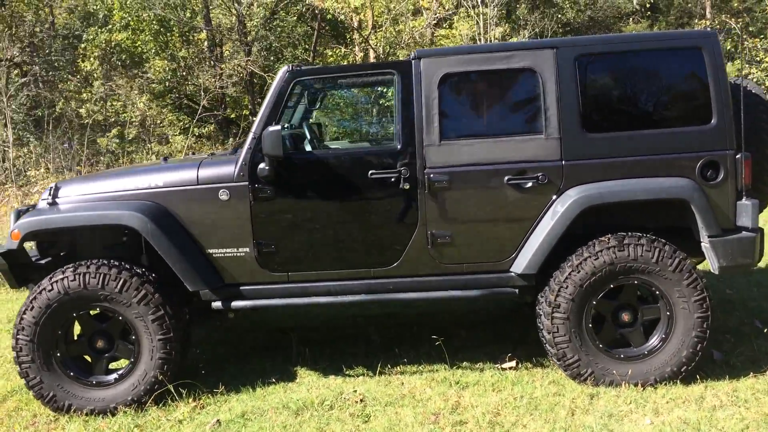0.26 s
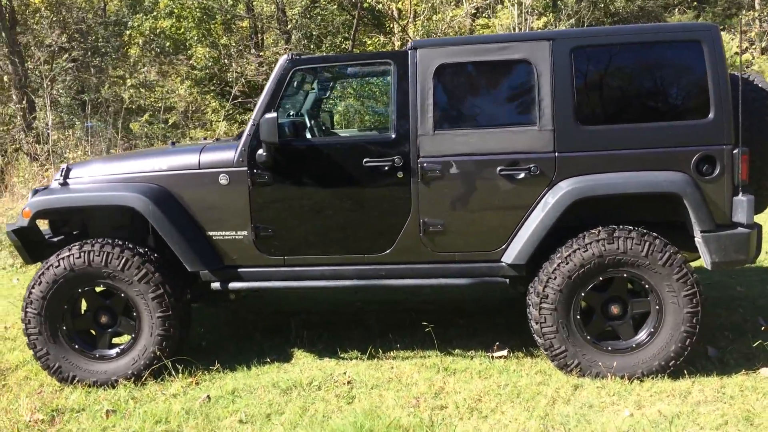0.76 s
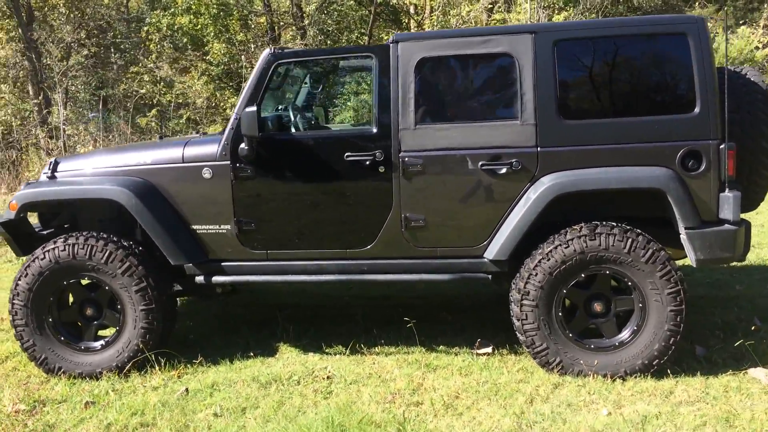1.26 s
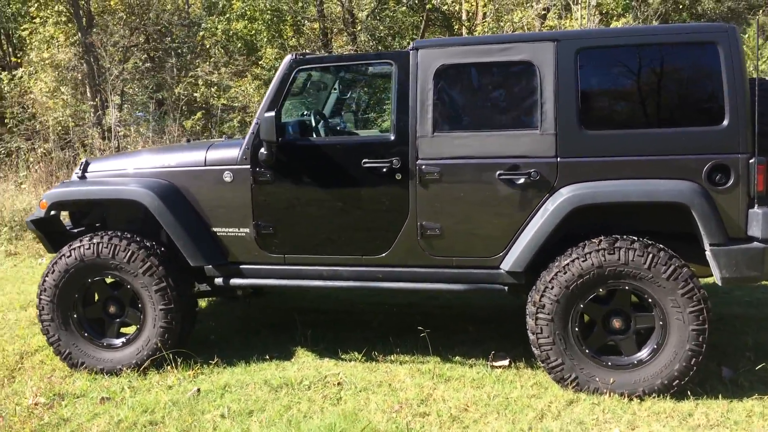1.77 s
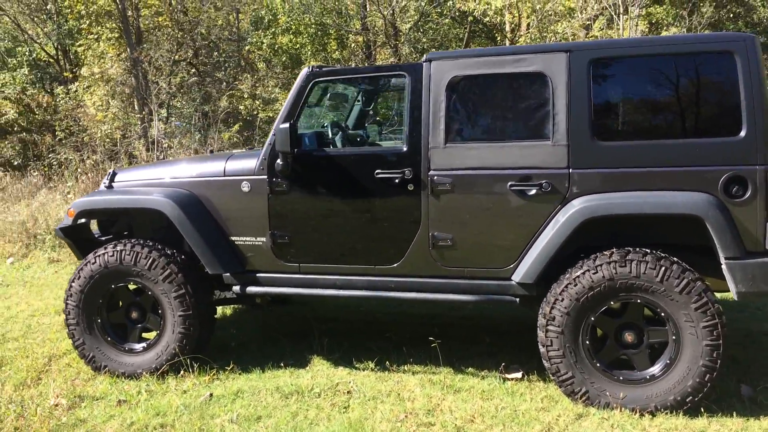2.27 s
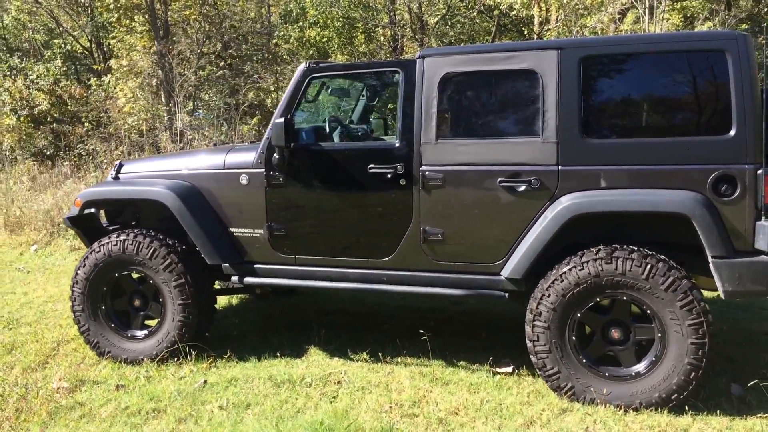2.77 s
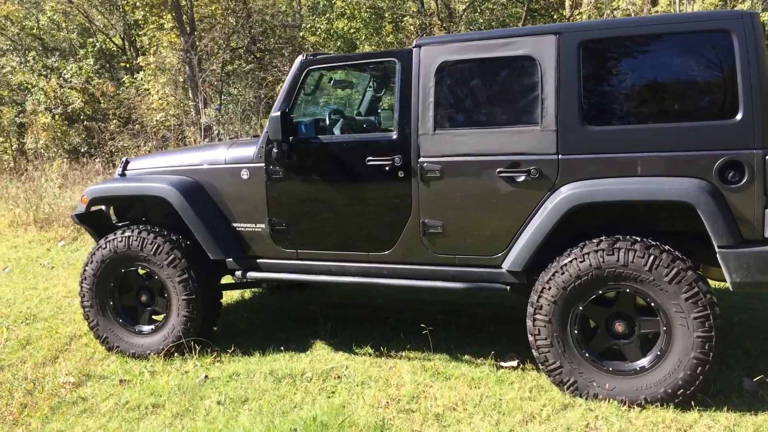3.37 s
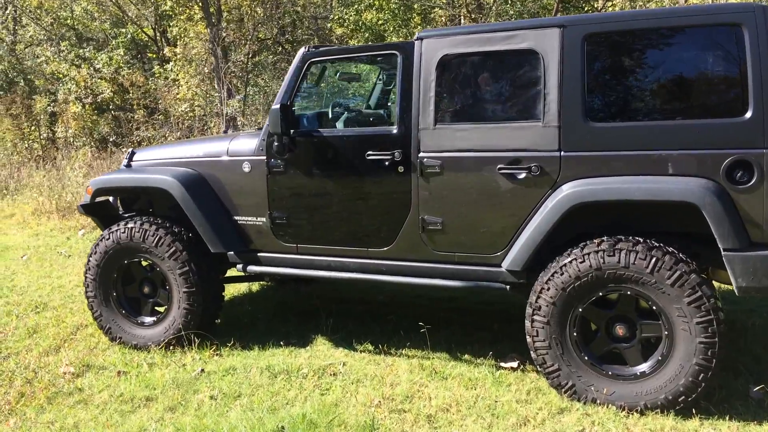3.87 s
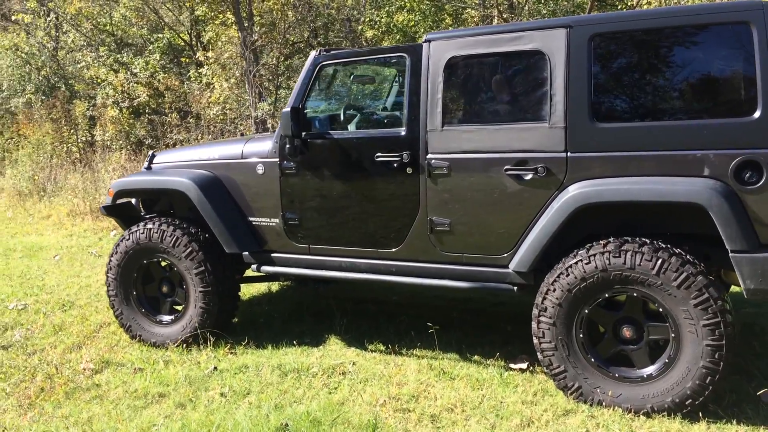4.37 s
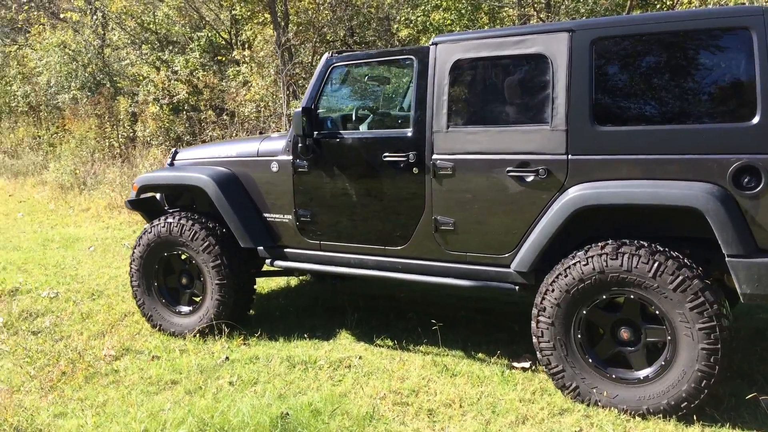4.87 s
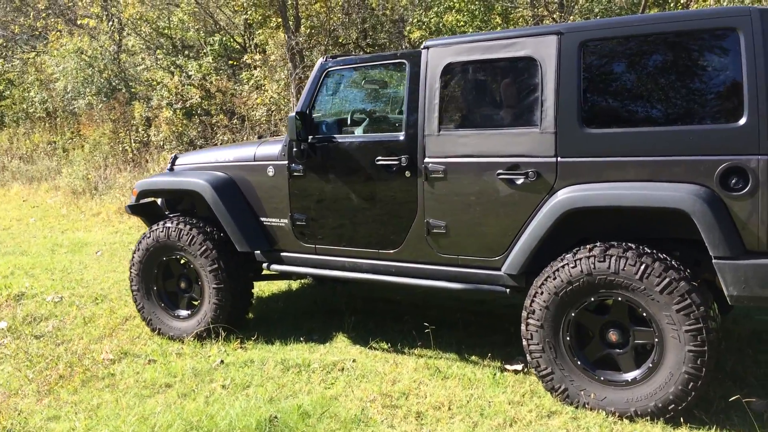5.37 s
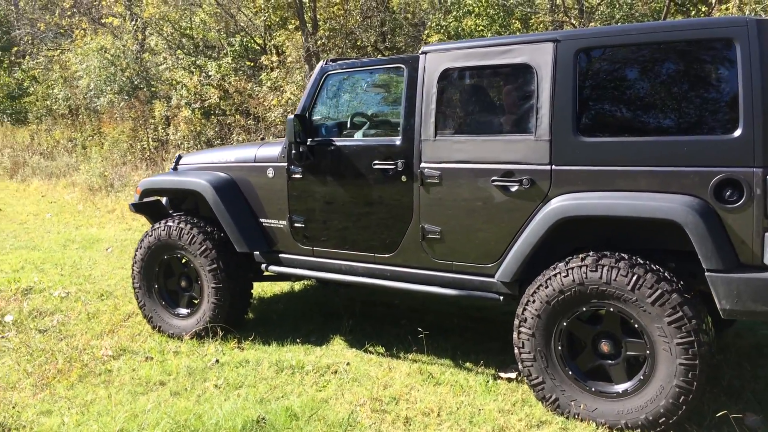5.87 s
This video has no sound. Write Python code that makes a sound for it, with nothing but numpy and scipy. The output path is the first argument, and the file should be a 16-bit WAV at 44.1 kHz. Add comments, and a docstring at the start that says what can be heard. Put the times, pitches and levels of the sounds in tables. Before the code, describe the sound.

Slow walking on a lawn, heard as soft bassy bumps through a handheld phone, over shrill insect shimmer, with a late burst of handling knocks.

```python
"""A lawn at the edge of a wood, where someone walks slowly holding a phone. Steps arrive as dull thuds
(bell-shaped pushes), grass swishes and shoes scuff it (filtered clicks). Near the end fingers knock
(damped modes) and rub (dense clicks) on the case. A katydid buzzes in short falling chirps over an
insect chorus of band noise, crickets trill faintly as pulsing tones and a wavering sine hums far away."""
import sys
import numpy as np
from scipy import signal
from scipy.fft import rfft, irfft, next_fast_len
from scipy.io import wavfile
from scipy.ndimage import uniform_filter1d

SR = 44100
rng = np.random.default_rng(int(sys.argv[2]) if len(sys.argv) > 2 else 0)


def dump_mix(stems):
    """Bounce the given channels to the path in sys.argv[1] as a 16-bit WAV at rate SR."""
    frames = np.atleast_2d(stems).T  # one column per channel
    limited = np.clip(frames, -1, 1)  # hard clip at full scale
    pcm = np.round(limited * 32767).astype(np.int16)
    wavfile.write(sys.argv[1], SR, pcm)


N = 269165
T = np.arange(N) / SR

# case slips in the grip: time_s, level_db
SLIP_EVENTS = [(.249, -50.5), (1.703, -39), (2.240, -44), (2.650, -45), (2.692, -46.5), (2.966, -48),
               (3.416, -45), (3.7238, -41.5), (4.204, -43), (4.696, -48), (4.7373, -30), (4.772, -38.5),
               (4.799, -37.5), (4.8238, -37.5), (4.8753, -35.5), (4.9002, -40), (4.9205, -41),
               (4.9484, -37.5), (5.058, -47), (5.0631, -42), (5.0773, -32), (5.1035, -43), (5.1163, -40.5),
               (5.1662, -38)]
# finger strikes the case and slides on: time_s, level_db, pitch_hz, snap_db (against the knock), slide_db
TAP_EVENTS = [(5.2362, -23, 706, 4, -52.5), (5.3066, -31, 980, 10.5, -38)]
# low rumble spectrum: freq_hz, relative_db
RUMBLE_SPECTRUM = [(20, -41), (35, -7.5), (55, 6.5), (80, 6), (130, 1.5), (200, -4), (280, -21),
                   (450, -49.5)]


def undb(db):
    """Decibels to gain."""
    return 10 ** (np.asarray(db) / 20)


def unit(x):
    """Scale to an rms of 1."""
    return x / np.sqrt(np.mean(x ** 2))


def curve(rows):
    """Join (time_s, value) rows by straight lines."""
    return np.interp(T, *np.transpose(rows))


def colour(x, points):
    """Causal minimum-phase filter through (freq_hz, db) points, via the folded cepstrum."""
    hz, db = np.transpose(points)
    size = next_fast_len(2 * N, real=True)
    size += size % 2
    f = np.maximum(np.fft.rfftfreq(size, 1 / SR), 1)
    gain = undb(np.interp(np.log(f), np.log(hz), db))
    cepstrum = irfft(np.log(gain))
    cepstrum[1:size // 2] *= 2
    cepstrum[size // 2 + 1:] = 0
    response = np.exp(rfft(cepstrum))
    return irfft(rfft(x, size) * response)[:N]


def resonate_twice(x, hz, width_hz):
    """Two equal resonances in series; width_hz is that of each."""
    b, a = signal.iirpeak(hz, hz / width_hz, fs=SR)
    return signal.lfilter(b, a, signal.lfilter(b, a, x))


def noise():
    """White noise."""
    return rng.standard_normal(N)


def walk(rate_hz):
    """Smoothed random steps, rms 1."""
    k = int(SR / rate_hz)
    steps = np.repeat(rng.standard_normal(N // k + 1), k)
    return unit(uniform_filter1d(steps, k)[:N])


def grains(rate_hz, spread_db):
    """Dense random clicks of uneven size."""
    hits = rng.random(N) < rate_hz / SR
    boost_db = spread_db * np.minimum(rng.exponential(size=N), 4)
    return hits * noise() * undb(boost_db)


def swell(peak_s, rise_s, fall_s):
    """Envelope of one stroke: Gaussian rise, near-exponential fall."""
    d = T - peak_s
    return np.exp(-np.where(d < 0, (d / rise_s) ** 2, np.abs(d / fall_s) ** 0.94))


def add(out, s, x):
    """Mix x into out from time s."""
    i = max(int(s * SR), 0)
    out[i:i + len(x)] += x[:max(N - i, 0)]


def push_acceleration(u):
    """Second derivative of a bell-shaped push; u is squared scaled time."""
    return (2 * u - 1) * np.exp(-u)


def thuds(low_cut_hz=38, heel_sharpness=5.1, shake_db=-15):
    """Each jolt is a bell-shaped push; the microphone feels its acceleration and loses the deepest part."""
    # steps and jolts through the arm: time_s, level_db, pitch_hz
    steps = [(0.2933, -19, 97), (.986, -36.5, 105), (1.331, -29, 108), (1.7156, -23.5, 121),
             (2.2476, -33.5, 121), (2.658, -33.5, 108), (2.971, -33.5, 147), (3.062, -16, 140),
             (3.52, -35, 148), (3.737, -19.5, 125), (4.284, -19.5, 125), (4.6339, -24.5, 122),
             (4.6991, -29.5, 227), (4.743, -27, 101), (4.7642, -22.5, 111), (4.7836, -30, 148),
             (4.805, -30, 109), (5.1768, -29.5, 110), (5.2362, -25.5, 114), (5.31, -12, 184),
             (5.6075, -25.5, 154)]
    # heel share climbs from soft to hard steps
    heel_soft, heel_hard, heel_from_db, heel_range_db = 0.064, .21, -22.5, 0.2
    out, half_s = np.zeros(N), .03
    t = np.arange(-half_s, half_s, 1 / SR)
    for s, db, hz in [*steps, *jolts()]:
        u = (np.pi * hz * t) ** 2
        hardness = 1 / (1 + np.exp((heel_from_db - db) / heel_range_db))
        heel_share = heel_soft + (heel_hard - heel_soft) * hardness
        sole = (1 - heel_share) * push_acceleration(u)
        heel = heel_share * push_acceleration(heel_sharpness * u)  # shorter, harder push
        add(out, s - half_s, undb(db) * (sole + heel))
    # the hand shakes a little around every jolt
    shake = uniform_filter1d(uniform_filter1d(np.abs(out), size=SR // 25), size=SR // 40)
    out = out + undb(shake_db) * shake * unit(colour(noise(), RUMBLE_SPECTRUM))
    return signal.sosfilt(signal.butter(2, low_cut_hz, "high", fs=SR, output="sos"), out)


def jolts(rate_hz=1.5, mean_db=-43, centre_hz=100, spread_db=8, slip_db=-3, slip_hz=160, slip_lag_s=0.0031):
    """Small pushes (time_s, level_db, pitch_hz): random hand jolts, and a nudge with every slip."""
    rows = []
    for when, size, pitch in rng.random((int(rate_hz * T[-1]), 3)):
        db = mean_db + spread_db * (2 * size - 1)
        rows.append((when * T[-1], db, centre_hz * 2 ** (pitch - .5)))
    for s, db in SLIP_EVENTS:
        rows.append((s + slip_lag_s, db + slip_db, slip_hz))
    return rows


def knocks(slip_contact_s=0.001, tap_contact_s=0.00041):
    """Slips of the grip ring the damped case softly; taps ring it hard and snap."""
    # case modes: pitch_ratio, relative_db, t60_s (divided by the damping)
    modes = [(0.998, -2.5, 0.014), (1.3, -7.5, 0.0042)]
    # snap spectrum: freq_hz, relative_db
    snap_spectrum = [(300, 5.5), (800, 1.5), (1200, 9), (1800, -3.5), (2600, 1.5), (3400, -8.5),
                     (4200, -18), (6000, -32), (8000, -40), (14000, -46)]
    start_hz, rise_hz_per_s = 667, 21  # slip pitch rises as the grip tightens
    pitch_scatter, slip_snap_db = 0.065, -17
    slip_damping = 1.27  # the case dies away faster under the skin
    out, t = np.zeros(N), T[:SR // 20]

    snap = colour(1. * (T == 0), snap_spectrum)[:len(t)]
    tail = 0.063 * noise()[:len(t)] * np.exp(-t / 0.0021)
    snap = np.convolve(snap, (t == 0) + tail)[:len(t)]
    snap = snap / np.abs(snap).max()

    hits = []
    for s, db in SLIP_EVENTS:
        hz = (start_hz + rise_hz_per_s * s) * (1 + pitch_scatter * rng.standard_normal())
        hits.append((s, db, hz, slip_snap_db, slip_contact_s, slip_damping))
    for s, db, hz, snap_db, _ in TAP_EVENTS:
        hits.append((s, db, hz, snap_db, tap_contact_s, 1))

    for s, db, hz, snap_db, contact_s, damping in hits:
        ring = np.zeros(len(t))
        for ratio, mode_db, t60_s in modes:
            decay = np.exp(-np.log(1000) * damping * t / t60_s)
            ring += undb(mode_db) * np.sin(2 * np.pi * hz * ratio * t) * decay
        ring *= 1 - np.exp(-t / contact_s)
        add(out, s, undb(db) * (ring / np.abs(ring).max() + undb(snap_db) * snap))
    return out


def scuffs_and_rubs(ring_db=-3, body_db=-1, ring_width_hz=600, rise_share=0.94):
    """Friction of shoes in grass, then of fingers on the case: dense clicks as body, resonance and rasp."""
    # shoe scuffs in the grass (first two rows), then finger slides on the case:
    # peak_s, length_s, level_db, resonance_hz, rasp_db
    friction_events = [(3.047, .018, -59.5, 1930, -5), (3.565, .014, -60, 2030, -3),
                       (4.79, .11, -56.5, 860, -15), (4.951, 0.024, -51.5, 625, 0.5),
                       (5.339, 0.029, -42.5, 1460, -25), (5.481, .016, -49, 830, -11.5),
                       (5.547, 0.037, -45, 940, -15), (5.597, .024, -40, 920, -11),
                       (5.714, .012, -54, 890, -12.5)]
    # spectra of body and rasp: freq_hz, relative_db
    body_spectrum = [(60, -17.5), (130, 7.5), (220, 13.5), (330, 4.5), (550, 0.5), (1000, -14.5),
                     (1700, -33), (2300, -46), (4500, -25.5), (9000, -67)]
    rasp_spectrum = [(1500, -13), (2100, -13), (2700, -5), (3000, -4), (3350, -11.5), (3650, -13),
                     (4300, -28), (6000, -27.5), (10000, -44)]
    # slide after each tap
    lag_s, rise_s, fall_s, slide_hz, slide_rasp_db = 0.0061, .0057, 0.046, 854, -16.5
    body = unit(colour(grains(6000, 5.2), body_spectrum))
    rasp = unit(colour(grains(8000, 0.89), rasp_spectrum))

    strokes = []
    for s, length_s, db, hz, rasp_db in friction_events:
        strokes.append((swell(s, rise_share * length_s, length_s), db, hz, rasp_db))
    for s, _, _, _, db in TAP_EVENTS:
        strokes.append((swell(s + lag_s, rise_s, fall_s), db, slide_hz, slide_rasp_db))

    out = np.zeros(N)
    for envelope, db, hz, rasp_db in strokes:
        ring = unit(resonate_twice(grains(6000, 2.7), hz, ring_width_hz))
        friction = undb(body_db) * body + undb(ring_db) * ring + undb(rasp_db) * rasp
        out += undb(db) * envelope * friction
    return out


def grass(rise_share=0.8):
    """Blades flick past the shoe: dense clicks, filtered and swelling in short swishes."""
    # shoe brushes: peak_s, length_s, level_db
    swishes = [(.3, 0.2, -68.5), (.79, 0.12, -67.5), (1.052, 0.069, -58.5), (1.205, 0.075, -56.5),
               (1.49, .045, -68.5), (1.665, 0.031, -62.5), (2.43, 0.075, -67.5)]
    # blade spectrum: freq_hz, relative_db
    blade_spectrum = [(1000, 2.5), (2000, -4), (3000, -12), (4000, -1.5), (5200, -8), (7600, 2.5),
                      (10000, -13.5), (15000, -27)]
    brushing = np.zeros(N)
    for s, length_s, db in swishes:
        brushing += undb(db) * swell(s, rise_share * length_s, length_s)
    return unit(colour(grains(3000, 2.6), blade_spectrum)) * brushing


def ticks(decay_s=0.00097):
    """Dry ticks of stalks and of a fingernail: tiny bursts of bright noise."""
    # ticks: time_s, level_db (before the filter)
    tick_events = [(0.1865, -37), (1.234, -37.5), (1.287, -42), (2.1355, -42), (5.235, -34.5)]
    # tick spectrum: freq_hz, gain_db
    tick_spectrum = [(600, -26), (2500, -13), (4300, -0.5), (7000, 3), (9000, -4), (12000, -26),
                     (15000, -32)]
    out, t = np.zeros(N), T[:SR // 100]
    for s, db in tick_events:
        tick = rng.standard_normal(len(t)) * np.exp(-t / decay_s)
        add(out, s, undb(db) * tick / np.abs(tick).max())
    return colour(out, tick_spectrum)


def katydid(stroke_hz=42.24, pitch_hz=7276, stroke_s=0.00151, glide_hz=220, rough=.35, echo_db=-7):
    """Every wing stroke is a short falling chirp; the leaves scatter it."""
    # stroke level before roughness and echo: time_s, level_db
    level_rows = [(0, -61.5), (1.4, -58.5), (1.9, -56.5), (3.5, -54.5), (5.3, -57), (6.1, -56.5)]
    out, t = np.zeros(N), T[:SR // 80]
    u = (t - t.mean()) / stroke_s
    draws = rng.standard_normal((int(T[-1] * stroke_hz), 3))
    for k, (late, size, pitch) in enumerate(draws):
        hz = pitch_hz * (1 + .007 * pitch) - glide_hz * u
        chirp = np.exp(-u ** 2 / 2) * np.sin(2 * np.pi * np.cumsum(hz) / SR)
        add(out, k / stroke_hz + .0017 * late, undb(1.1 * size) * chirp)
    out *= (1 + rough * walk(1200)) * undb(curve(level_rows))
    t_echo = T[:SR // 8]
    leaves = rng.standard_normal(len(t_echo)) * np.exp(-t_echo / 0.041)
    echo = signal.fftconvolve(out, leaves / np.linalg.norm(leaves))[:N]
    return out + undb(echo_db) * echo


def crickets(trill_hz=48, depth=0.34, flutter_db=2.0):
    """Far trills: nearly pure, pulsing tones with a wandering pitch and strength."""
    # trills: start_s, end_s, pitch_hz, level_db
    trills = [(-.1, .65, 3785, -80.5), (.72, 3.65, 3808, -80), (4.4, 5.75, 3810, -82.5),
              (5.83, 6.1, 3800, -80), (2.95, 3.2, 4570, -85), (5.0, 5.5, 4570, -82.5)]
    out, edge_s = np.zeros(N), .03
    for start, end, hz, db in trills:
        gate = np.clip(np.minimum(T - start, end - T) / edge_s, 0, 1)
        wandering_hz = hz * (1 + .004 * walk(4) + 0.0082 * walk(200))
        tone = np.sin(2 * np.pi * np.cumsum(wandering_hz) / SR)
        trill = unit(tone * (1 + depth * np.sin(2 * np.pi * trill_hz * T)))
        out += undb(db + flutter_db * walk(25)) * gate * trill
    return out


def drones():
    """Far machine whine, distant trills and air resonances as narrow noise bands that swell and fade."""
    # bands: freq_hz, width_hz (each of two resonances), level_db, flutter_db
    bands = [(676, 30, -76, 3), (1129, 26, -87, 3.5), (1415, 81, -78.5, 3), (2624, 330, -78, 2.5),
             (3160, 190, -87, 4)]
    out = np.zeros(N)
    for hz, width_hz, db, flutter_db in bands:
        out += unit(resonate_twice(noise(), hz, width_hz)) * undb(db + flutter_db * walk(11))
    return out


def chorus(level_db=-67.5):
    """Insect chorus: band noise with a quick slight flutter."""
    # chorus spectrum: freq_hz, relative_db
    chorus_spectrum = [(4500, -45), (6000, -12.5), (6600, -4), (7000, 0.5), (7300, 5.5), (7850, 5.5),
                       (8300, -10.5), (9500, -14.5), (11000, -19), (15000, -50)]
    return unit(colour(noise(), chorus_spectrum)) * undb(level_db + 0.77 * walk(80))


def hum(pitch_hz=102.6, level_db=-59.5, peak_s=1.7, swell_s=.6, swell_db=9.5):
    """Far hum: a sine of wavering pitch and level with one Gaussian swell."""
    db = level_db + swell_db * np.exp(-((T - peak_s) / swell_s) ** 2)
    tone = np.sin(2 * np.pi * np.cumsum(pitch_hz + 1.39 * walk(6)) / SR)
    return tone * undb(db + 2 * walk(6.68))


def rumble(offset_db=1, sway_db=2):
    """Low rumble of the hand and the breeze: filtered noise of swaying level."""
    # level before the offset and sway: time_s, level_db
    level_rows = [(0.0, -52), (1.0, -55), (1.48, -53), (2.99, -55.5), (3.13, -57), (4.08, -52), (4.31, -61),
                  (4.54, -59), (4.77, -51), (5.44, -50), (5.78, -58), (6.1, -53.5)]
    db = offset_db + curve(level_rows) + sway_db * walk(18)
    return unit(colour(noise(), RUMBLE_SPECTRUM)) * undb(db)


def air(level_db=-64.5):
    """Distant air: filtered noise that wavers slightly."""
    # air spectrum: freq_hz, relative_db
    air_spectrum = [(150, -17), (250, -2.5), (450, 3.5), (680, -0.5), (850, -4), (1170, 1.5), (1450, -5.5),
                    (1620, -7), (2600, -8), (2950, -15.5), (3400, -15), (6000, -17), (8000, -33.5)]
    return unit(colour(noise(), air_spectrum)) * undb(level_db + 0.75 * walk(4.9))


def scene():
    """Everything at the one microphone."""
    near = thuds() + knocks() + scuffs_and_rubs() + grass() + ticks()
    far = katydid() + crickets() + drones() + chorus()
    return (near + far + hum() + rumble() + air())[None]


def record(dry, top_hz=15250):
    """The phone cuts the top: a steep elliptic low-pass."""
    return signal.sosfilt(signal.ellip(10, .2, 70, top_hz, fs=SR, output="sos"), dry)


dry = scene()
out = record(dry)
dump_mix(out)
```